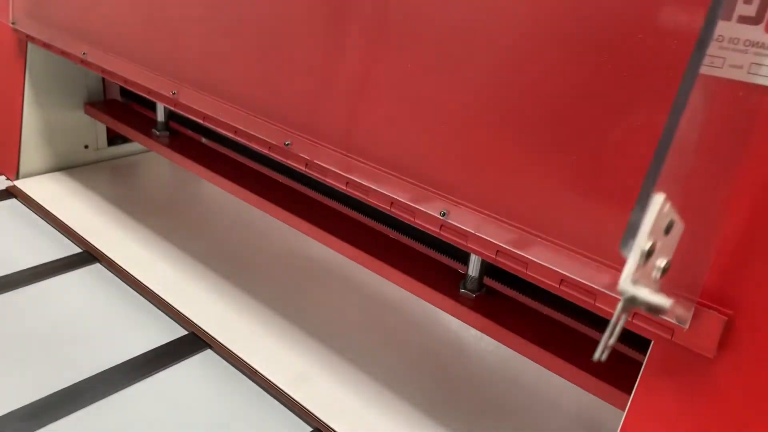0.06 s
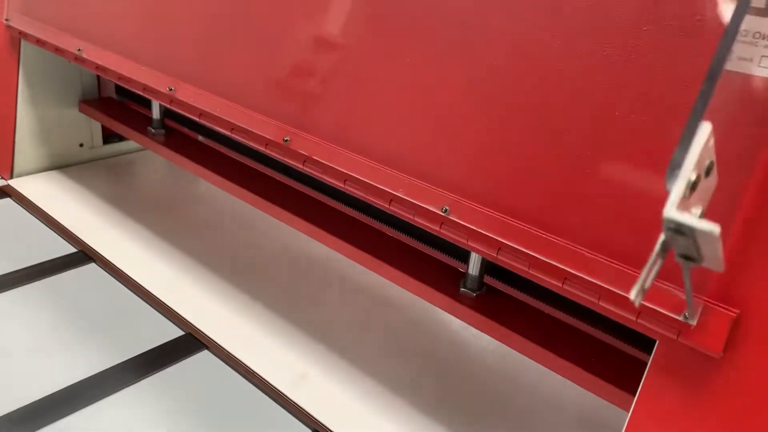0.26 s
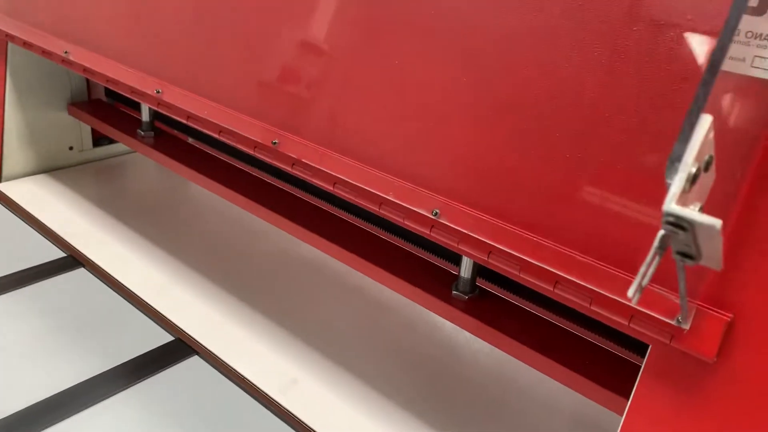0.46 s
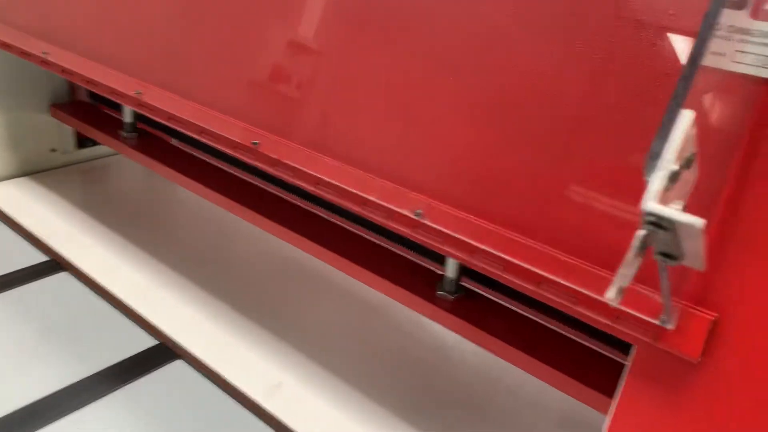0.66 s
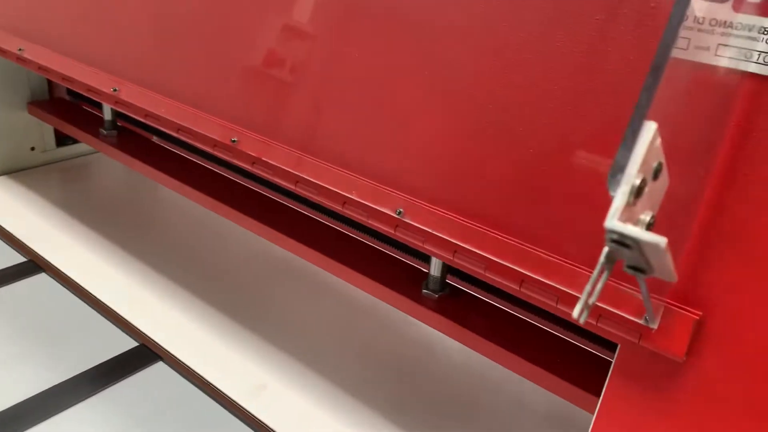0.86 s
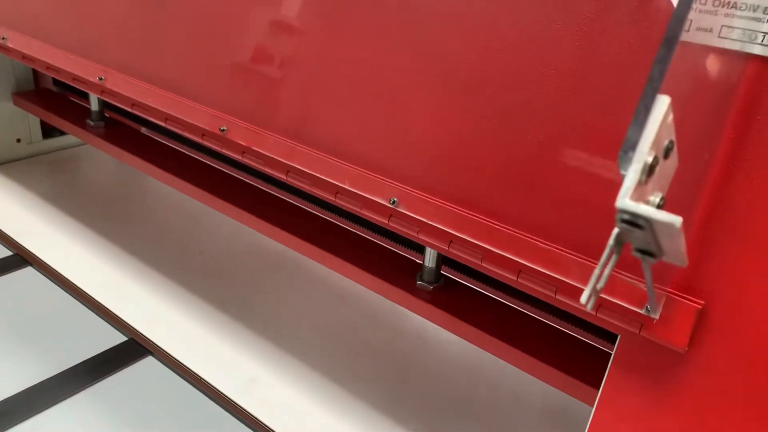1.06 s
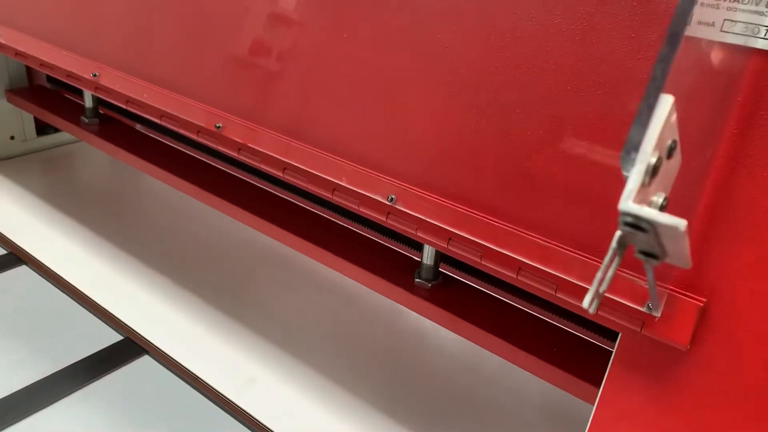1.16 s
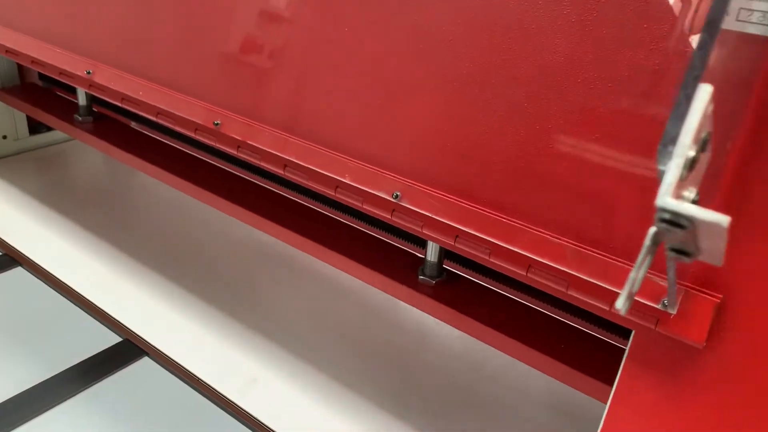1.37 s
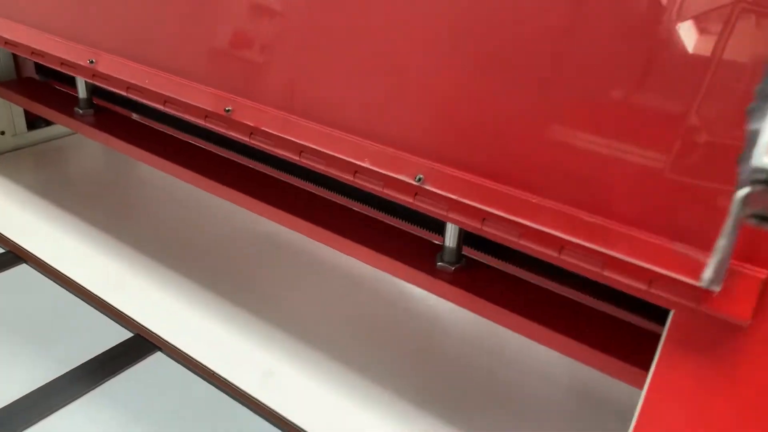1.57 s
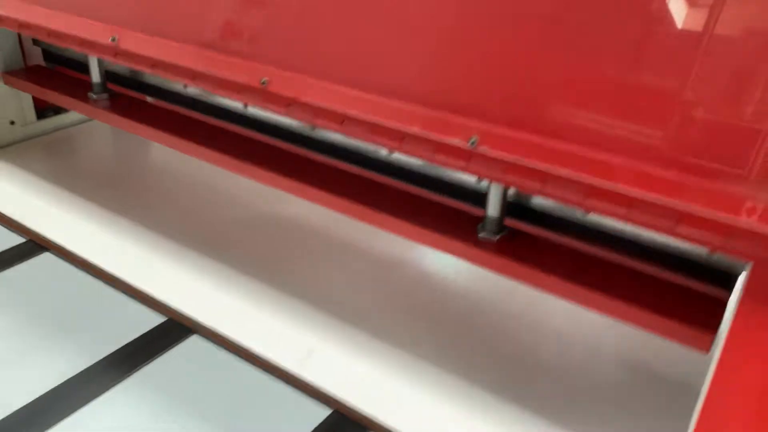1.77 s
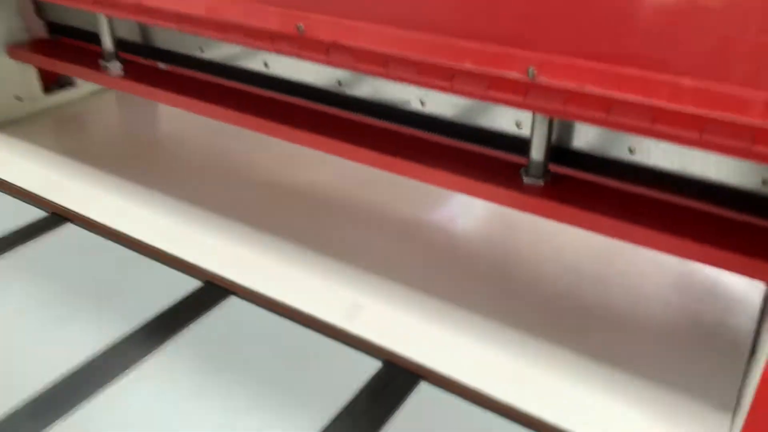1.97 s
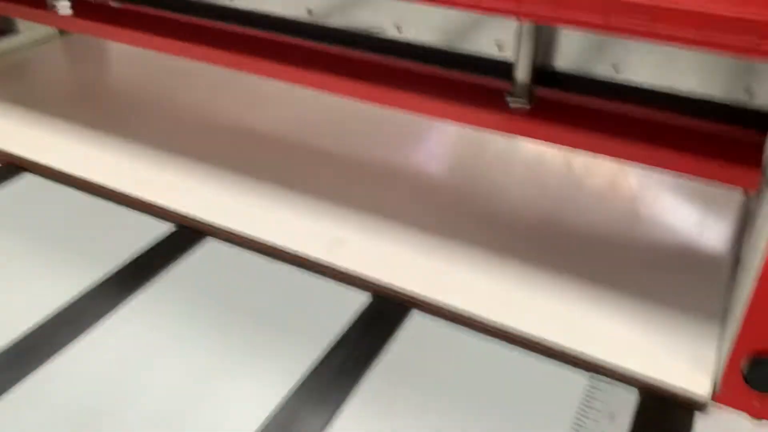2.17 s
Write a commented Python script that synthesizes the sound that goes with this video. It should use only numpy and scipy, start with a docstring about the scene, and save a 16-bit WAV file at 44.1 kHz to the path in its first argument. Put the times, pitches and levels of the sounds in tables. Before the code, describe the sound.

A fabric cutting machine starts with a short rush and scrape. At about 0.25 seconds its blade snaps down with a loud thud, and the steel body rattles and rings away into the workshop. A small dull clack comes at 0.9 seconds. Near 1.5 seconds a faint, brief whistle becomes a soft air hiss, with rubbing and light taps until 2.2 seconds. A low motor hum runs throughout.

```python
"""A short rush and scrape over a low hum: a fabric pinking machine drives its blade bar down for one stroke.
The blade snaps through the cloth, and the steel frame thuds, rattles and rings away into the workshop.
A small clack follows as the mechanism settles. Then air whistles and hisses out of a valve while the
mechanism slides back with a few taps. The motor's hum and a faint high whir run underneath throughout."""
import sys
import numpy as np
from scipy import signal
from scipy.fft import rfft, irfft, next_fast_len
from scipy.io import wavfile
from scipy.ndimage import map_coordinates

SR = 44100
rng = np.random.default_rng(int(sys.argv[2]) if len(sys.argv) > 2 else 0)


def unload_wav(signal):
    """Save mono or channel-first audio to the path in sys.argv[1] as 16-bit WAV at rate SR, clipped to [-1, 1]."""
    wavfile.write(
        sys.argv[1],
        SR,
        np.round(np.clip(np.atleast_2d(signal).T, -1, 1) * 32767).astype(np.int16),
    )


N = 97020


def amp(db):
    """Decibels to gain."""
    return 10 ** (np.asarray(db) / 20)


def unit(x):
    """Scale to rms 1."""
    return x / np.sqrt(np.mean(x ** 2) + 1e-20)


def along(points, hz):
    """Read a curve of (Hz, value) points on a log frequency axis."""
    freqs, values = np.transpose(points)
    return np.interp(np.log(hz + 1), np.log(freqs + 1), values)


def curves(rows):
    """Automation lanes: one value per sample for each column after the time."""
    times, *columns = np.transpose(rows)
    return [np.interp(np.arange(N) / SR, times, column) for column in columns]


def wobble(rate):
    """A smooth random curve, rate knots a second."""
    return map_coordinates(rng.standard_normal(N // 20), [np.arange(N) * rate / SR + 2], mode="wrap")


def filtered(x, response):
    """Shape x with a gain given as a function of frequency."""
    size = next_fast_len(N + SR // 2)
    return irfft(rfft(x, size) * response(np.fft.rfftfreq(size, 1 / SR)), size)[..., :N]


def dying(x, t60s):
    """Let each frequency of x die at its own speed."""
    hz, t, bins = signal.stft(x, SR, nperseg=256)
    decay = amp(-60 * t / along(t60s, hz)[:, None])
    return signal.istft(bins * decay, SR, nperseg=256)[1][:, :N]


def hit(db, attack_s, t60):
    """A percussive envelope: quick rise, exponential decay."""
    t = np.arange(N) / SR
    return amp(db - 60 * t / t60) * (1 - np.exp(-t / attack_s))


def add(out, s, x):
    """Mix x into out from time s on."""
    start = round(s * SR)
    out[:, start:] += x[:, :N - start]


# Stereo image. Each row: frequency in Hz, left-right correlation.
STEREO_IMAGE = [(60, 0.9), (200, 0.99), (380, 0.4), (700, 0.4), (1300, 0.011), (2400, -0.1), (4400, 0.29),
                (10000, -0.29)]

def stereo_angle(hz):
    """Mid-side angle in radians: nearly mono in the bass, wide in the treble."""
    return np.arccos(np.clip(along(STEREO_IMAGE, hz), -1, 1)) / 2


def noise(spectrum, peaks=()):
    """Coloured stereo noise of rms 1 with optional resonances."""
    def response(hz):
        angle = stereo_angle(hz)
        bells_db = sum(boost / (1 + (2 * (hz - centre) / width) ** 2) for centre, width, boost in peaks)
        return amp(along(spectrum, hz) + bells_db) * [np.cos(angle), np.sin(angle)]
    mid, side = filtered(rng.standard_normal((2, N + SR // 2)), response)
    return unit(np.array([mid + side, mid - side]))


# Colours of the rumble and the whir. Each row: frequency in Hz, relative level in dB.
RUMBLE_EQ = [(20, -12.5), (40, -9), (58, 8), (85, 2.5), (160, 2.5), (250, -10.5), (400, -20), (800, -19.5),
             (1600, -27.5), (3000, -38), (6000, -65), (16000, -59)]
WHIR_EQ = [(5000, -17.5), (7300, -34), (8500, -5), (9900, 3.5), (10700, -5.5), (12000, -40), (13500, -8),
           (15000, -10), (15700, -25)]
# The rumble gathers around the hum. Each row: centre in Hz, width in Hz, boost in dB.
RUMBLE_PEAKS = [(59.4, 23, 2.5)]

def background(hum_hz=58.8, hum_db=-48.5, waver_db=1.8, drift_rad=0.43, rumble_db=-52, whir_db=-75):
    """The bed: a wavering motor hum, workshop rumble and a faint high whir."""
    tone = unit(np.sin(2 * np.pi * hum_hz * np.arange(N) / SR + drift_rad * wobble(4.1)))
    hum = amp(hum_db + waver_db * wobble(14)) * tone
    return hum + amp(rumble_db) * noise(RUMBLE_EQ, RUMBLE_PEAKS) + amp(whir_db) * noise(WHIR_EQ)


def reverb(x, t60s, levels, build_s):
    """A diffuse stereo tail, fed from the left channel, that builds up and dies away."""
    t = np.arange(N) / SR
    white = noise([(20, 0), (20000, 0)])
    tail = dying(white, t60s) * (1 - np.exp(-t / build_s))
    tail = filtered(tail / np.linalg.norm(tail[0]), lambda hz: amp(along(levels, hz)))
    return signal.fftconvolve(x[:1], tail, axes=1)[:, :N]


# Reverb times of the two spaces. Each row: frequency in Hz, seconds to fall 60 dB.
HOUSING_DECAY = [(100, 0.51), (300, 0.25), (1000, 0.43), (3000, 0.12), (9000, .35), (15000, 0.28)]
WORKSHOP_DECAY = [(60, 1.4), (150, 2.2), (300, 2.59), (700, 2.01), (2000, 1.96), (4500, 1.555),
                  (7000, 1.21), (10000, 0.88), (15000, 0.46)]
# Their reverb returns. Each row: frequency in Hz, gain in dB.
HOUSING_EQ = [(60, -18), (150, -4.5), (300, -8), (700, -6), (2000, -12), (3700, -4.5), (5200, -13),
              (10000, -12), (15000, -23.5)]
WORKSHOP_EQ = [(60, -7.5), (140, -6), (300, -11.5), (700, -14), (2000, -17.5), (3700, -15.5), (5200, -12.5),
               (10000, -27.5), (15000, -34)]

def reflections(stroke, air, air_send_db=-8):
    """The housing answers the stroke briefly; the workshop gives stroke and air a long tail."""
    housing = reverb(stroke, HOUSING_DECAY, HOUSING_EQ, build_s=0.01)
    workshop = reverb(stroke + amp(air_send_db) * air, WORKSHOP_DECAY, WORKSHOP_EQ, build_s=0.029)
    return housing + workshop


# Colours of the returning rub and its taps. Each row: frequency in Hz, relative level in dB.
RUB_EQ = [(100, 2), (350, -1.5), (600, -1.5), (850, -8), (1250, 3), (1800, -7.5), (2700, -13), (4000, -10),
          (7000, -21), (10000, -37), (14000, -37.5)]
TAP_EQ = [(80, -41), (200, -4), (400, -3), (800, -10), (1500, -22), (3000, -37), (8000, -58.5)]
# Resonances of the rub. Each row: centre in Hz, width in Hz, boost in dB.
RUB_PEAKS = [(384, 110, 7.3), (1070, 56, 2.9), (1990, 99, 4.8), (2610, 70, 4.4), (3706, 100, 9.7)]
# Swell of the rub. Each row: time in seconds, level in dB.
RUB_FADER = [(1.4, -85.5), (1.6, -71), (1.78, -68), (1.975, -66), (2.01, -56.5), (2.1, -55), (2.2, -53.5)]
# Light taps on the way back. Each row: start in seconds, level in dB.
TAP_CUES = [(1.759, -53.5), (2.004, -55.5), (2.079, -50), (2.144, -47.5)]

def slide_back(flutter_db=1.2, grain_db=2.2):
    """The mechanism returns with a swelling, grainy rub and a few taps."""
    rub_db = curves(RUB_FADER)[0] + flutter_db * wobble(40) + grain_db * wobble(300)
    out = amp(rub_db) * noise(RUB_EQ, RUB_PEAKS)
    for s, db in TAP_CUES:
        add(out, s, hit(db, attack_s=0.00055, t60=0.092) * noise(TAP_EQ))
    return out


def air_tone(hz, waver_hz=30, rasp_db=2):
    """A whistling tone that flickers in pitch and level."""
    phase = 2 * np.pi * np.cumsum(hz + waver_hz * wobble(400)) / SR
    return unit(np.sin(phase) * amp(rasp_db * wobble(250)))


# The main whistle. Each row: time in seconds, pitch in Hz, level in dB, roughness from 0 to 1.
WHISTLE_PATH = [(1.445, 4600, -82, .95), (1.456, 4650, -71, .8), (1.468, 4720, -66, .6),
                (1.48, 4820, -61, .4), (1.493, 4930, -63, .15), (1.517, 4994, -57, .03),
                (1.55, 5067, -64, .08), (1.59, 5075, -83, .4)]
# Brief side whistles. Each row: peak time in seconds, pitch in Hz, level in dB.
CHIRP_CUES = [(1.51, 8700, -77), (1.56, 3900, -73), (1.585, 6800, -73), (1.625, 6280, -70)]

def valve_whistle(rasp_spread_hz=200, chirp_s=0.01):
    """Air escapes: a rasp narrows to a short rising whistle, then breaks up into chirps."""
    t = np.arange(N) / SR
    pitch, level_db, rough = curves(WHISTLE_PATH)
    turbulence = unit(filtered(rng.standard_normal(N), lambda hz: 1 / (1 + (hz / rasp_spread_hz) ** 2)))
    voice = np.sqrt(1 - rough) * air_tone(pitch) + np.sqrt(rough) * turbulence * air_tone(pitch)
    gate = (t > WHISTLE_PATH[0][0]) & (t < WHISTLE_PATH[-1][0])
    chirps = sum(amp(db) * np.exp(-((t - s) / chirp_s) ** 2) * air_tone(hz) for s, hz, db in CHIRP_CUES)
    return amp(level_db) * voice * gate + chirps


# Colour of the hiss. Each row: frequency in Hz, relative level in dB.
HISS_EQ = [(1000, -8.5), (2400, 6.5), (3300, -22), (4200, 5), (4900, 4.5), (6200, 5), (7000, -5.5),
           (8000, -11), (10000, -35.5), (15000, -45)]
# Its resonances. Each row: centre in Hz, width in Hz, boost in dB.
HISS_PEAKS = [(4680, 61, 4.1), (5130, 120, 2.5), (5800, 220, 2.7), (6430, 79, 4.3), (6850, 38, 2.1),
              (7950, 240, 8.8)]
# Its swell. Each row: time in seconds, level in dB.
HISS_FADER = [(1.425, -92.5), (1.455, -82), (1.55, -70.5), (1.65, -63.5), (1.8, -63), (2.0, -63),
              (2.2, -64)]
# Faint whistles inside it. Each row: pitch in Hz, level in dB relative to the hiss.
HISS_WHISTLES = [(4700, -13), (5150, -15), (5900, -13), (6300, -11), (6750, -12)]

def valve_hiss(wander_hz=110, swing_db=5, swings_per_s=28, flutter_db=1.3):
    """The escaping air swells to a held hiss with faint whistles wandering through it."""
    singing = np.zeros(N)
    for hz, db in HISS_WHISTLES:
        tone = air_tone(hz + wander_hz * wobble(swings_per_s))
        singing += amp(db) * unit(tone * amp(swing_db * wobble(swings_per_s)))
    level_db = curves(HISS_FADER)[0] + flutter_db * wobble(45.18)
    return amp(level_db) * (noise(HISS_EQ, HISS_PEAKS) + singing)


# Colour of the clack. Each row: frequency in Hz, relative level in dB.
CLACK_EQ = [(100, -15), (400, -4), (750, 8), (1100, 1), (1600, 2), (2600, -7), (3600, -19), (6000, -46),
            (12000, -56)]
# Its quick bounces. Each row: start in seconds, level in dB.
CLACK_CUES = [(0.9175, -45), (0.9222, -41.5), (0.9268, -42.5)]

def clack():
    """A dull clack as the mechanism settles after the cut."""
    out = np.zeros((2, N))
    for s, db in CLACK_CUES:
        add(out, s, hit(db, attack_s=0.0007, t60=0.035) * noise(CLACK_EQ))
    return out


# Colours of the drive's rush and the bar's scrape. Each row: frequency in Hz, relative level in dB.
RUSH_EQ = [(50, -32), (110, 5), (300, 4.5), (600, -2), (1000, -13.5), (1600, -27.5), (3000, -69.5),
           (6000, -62.5)]
SCRAPE_EQ = [(300, -47), (700, 15), (1000, 2), (1700, -4), (2700, -15.5), (3500, -37), (6000, -49)]
# Resonances of the scraping bar. Each row: centre in Hz, width in Hz, boost in dB.
BAR_PEAKS = [(721, 27, 2.6), (985, 49, 18), (1280, 27, 2.4), (1616, 97, 10.6), (1990, 58, 4.6),
             (2900, 74, 9.7)]
# The run-up to the cut. Each row: time in seconds, level in dB.
RUSH_FADER = [(0, -46), (.06, -39), (.15, -38.5), (.24, -41.5), (.3, -72)]
SCRAPE_FADER = [(.03, -85.5), (.07, -43), (.095, -43.5), (.125, -48), (.15, -45.5), (.185, -53.5),
                (.22, -41), (.245, -50), (.28, -72.5)]

def drive(flutter_db=0.5):
    """The rush and scrape of the blade bar on its way down."""
    rush = amp(curves(RUSH_FADER)[0]) * noise(RUSH_EQ)
    scrape = amp(curves(SCRAPE_FADER)[0] + flutter_db * wobble(110)) * noise(SCRAPE_EQ, BAR_PEAKS)
    gate = np.arange(N) / SR < RUSH_FADER[-1][0]
    return (rush + scrape) * gate


# Colour of the panels. Each row: frequency in Hz, relative level in dB.
PANEL_EQ = [(150, -26), (450, 6), (700, 8), (900, 3), (1400, -6.5), (1800, -2.5), (2500, -5.5), (3700, -17),
            (5000, -22.5), (7000, -33), (8500, -21.5), (10500, -33), (12000, -54.5), (15000, -41)]
# Their resonances. Each row: centre in Hz, width in Hz, boost in dB.
PANEL_RESONANCES = [(730, 93, 4.5), (1030, 77, 0), (1336, 240, 9.5), (1350, 28, 8), (2213, 300, 5),
                    (4360, 90, 3)]

def panel_noise():
    """The metallic voice of the panels, shared by rattle and clank."""
    return noise(PANEL_EQ, PANEL_RESONANCES)


def rattle(count=70, per_s=240, base_db=-33.5, spread_db=6, fall_db_per_s=75, t60=0.012, attack_s=0.00031):
    """Loose panels chatter in irregular, fading contacts from the frame's third blow on."""
    t = np.arange(N // 10) / SR
    jitter, force = rng.random((count, 2)).T
    delays_s = (np.arange(count) + jitter) / per_s
    gains = amp(spread_db * (2 * force - 0.5) - fall_db_per_s * delays_s)
    starts = ((BLOW_CUES[2][0] + delays_s) * SR).astype(int)
    contacts = np.bincount(starts, gains, N)[:N]
    contact_shape = amp(-60 * t / t60) * (1 - np.exp(-t / attack_s)) ** 2
    envelope = signal.fftconvolve(contacts, contact_shape)[:N]
    return amp(base_db) * envelope * panel_noise()


# Modes of the steel frame. Each row: pitch in Hz, relative level in dB, seconds to fall 60 dB.
FRAME_MODES = [(76, -11, .8), (129, -4, 1.4), (160, -3, .5), (184, -7, 1.2), (242, -10, 1.0),
               (255, -5, .55), (325, -6, .55), (387, -8, .55), (508, -10, .6), (560, -10, .35),
               (658, -5, .45), (730, -6, .28), (991, -9, .4), (1160, -13, .3), (1277, -7, .22),
               (1404, -7, .28), (2300, -16, .2), (4387, -21, .25)]
# Decay of a panel clank. Each row: frequency in Hz, seconds to fall 60 dB.
CLANK_DECAY = [(150, 0.25), (700, 0.068), (2000, 0.11), (5000, 0.15), (10000, .07)]
# Colour of the thud. Each row: frequency in Hz, relative level in dB.
THUD_EQ = [(30, -40.5), (70, -14.5), (100, -7.5), (150, -3), (260, -4), (400, -9.5), (700, -33.5),
           (1500, -26.5), (4000, -79)]
# Blows on the frame. Each row: start in seconds, clank in dB, thud in dB, thud pitch in Hz, ring in dB.
BLOW_CUES = [(.245, -21, -26, 250, -31), (0.2494, -18, -16, 250, -25.5), (0.2534, -18.5, -17, 250, -35),
             (.276, -29, -21, 170, -38), (.283, -23, -21, 76, -31), (.317, -31, -17.5, 140, -36),
             (.326, -36, -18, 160, -40), (.336, -36, -28, 160, -42), (.393, -40.5, -34.5, 180, -41),
             (0.451, -35.5, -33, 130, -46)]

def frame(boom_db=-4, waver_rad=0.9, attack_s=0.0005):
    """Every blow clanks the panels, thumps the body at its own pitch and rings the frame's modes."""
    t = np.arange(N) / SR
    out, ring = np.zeros((2, N)), np.zeros((2, N))
    for hz, db, t60 in FRAME_MODES:
        spread = stereo_angle(hz) * np.array([[1], [-1]])
        waver = waver_rad * wobble(25)  # rattling joints unsettle the ring
        ring += amp(db - 60 * t / t60) * np.sin(2 * np.pi * hz * t + spread + waver)
    for s, clank_db, thud_db, thud_hz, ring_db in BLOW_CUES:
        clank = amp(clank_db) * dying(panel_noise(), CLANK_DECAY)
        body = noise(THUD_EQ) + amp(boom_db) * np.sin(2 * np.pi * thud_hz * t)
        thud = hit(thud_db, attack_s=0.0051, t60=0.13) * body
        add(out, s, (clank + thud + amp(ring_db) * ring) * (1 - np.exp(-t / attack_s)))
    return out


# Colours of the shearing cloth and the snaps. Each row: frequency in Hz, relative level in dB.
SHEAR_EQ = [(800, -19), (2300, 2.5), (3200, -25.5), (5000, -11), (7000, -18.5), (10000, -23.5),
            (15000, -34.5)]
SNAP_EQ = [(300, -22), (750, 9), (1100, -3.5), (1600, 8), (2800, 3), (5000, -8.5), (7000, -12.5),
           (8500, -8.5), (10000, -2.5), (11500, -17), (13500, -16), (16000, -19.5)]
# Snaps of the blade. Each row: start in seconds, level in dB.
SNAP_CUES = [(0.2431, -27), (0.2450, -17), (0.2461, -8.5), (0.2477, -16), (.283, -28)]

def blade(shear_db=-31.5, slope_db_per_s=2298.5, left_delay_s=0.000218):
    """A swelling rasp as the blade presses into the cloth, then hard, bright snaps as it bites through."""
    from_bite_s = np.abs(np.arange(N) / SR - SNAP_CUES[1][0])
    out = noise(SHEAR_EQ) * amp(shear_db - slope_db_per_s * from_bite_s)
    delays_s = np.array([[left_delay_s], [0]])  # the snaps reach the right side first
    for s, db in SNAP_CUES:
        snap = hit(db, attack_s=0.0003, t60=0.012) * noise(SNAP_EQ)[0]
        add(out, s, filtered(snap, lambda hz: np.exp(-2j * np.pi * hz * delays_s)))
    return out


def scene():
    """The stroke answered by the housing and the workshop, with the quieter sounds around it."""
    stroke = blade() + frame() + rattle() + clack()
    air = valve_whistle() + valve_hiss()
    return stroke + reflections(stroke, air) + drive() + air + slide_back() + background()


def record(dry, low_cut_hz=32, top_hz=15700):
    """Two microphones of slightly different colour, with the deepest bass and highest treble cut."""
    # Each row: frequency in Hz, left level over right in dB.
    balance = [(60, -1), (170, -2.24), (360, -2.0), (650, 1.0),
               (1300, 2.0), (2600, -0.6), (5500, -1.2), (10000, -0.3)]
    sides = np.array([[0.5], [-0.5]])
    trimmed = signal.sosfilt(signal.butter(2, low_cut_hz, "highpass", fs=SR, output="sos"), dry)
    return filtered(trimmed, lambda hz: amp(along(balance, hz) * sides) * (hz < top_hz))


dry = scene()
out = record(dry)
unload_wav(out)
```